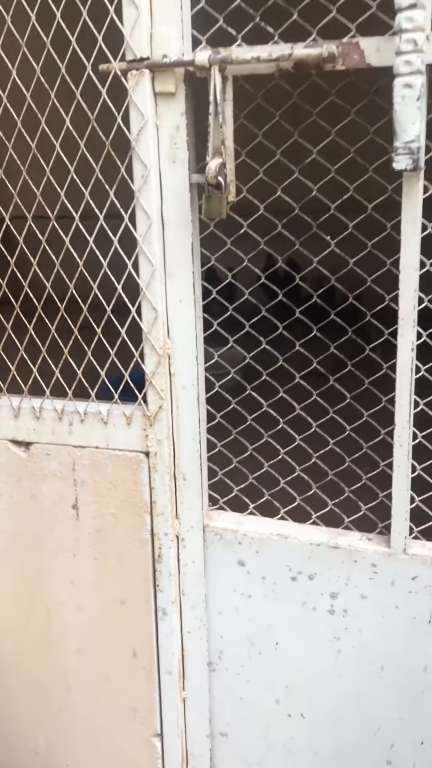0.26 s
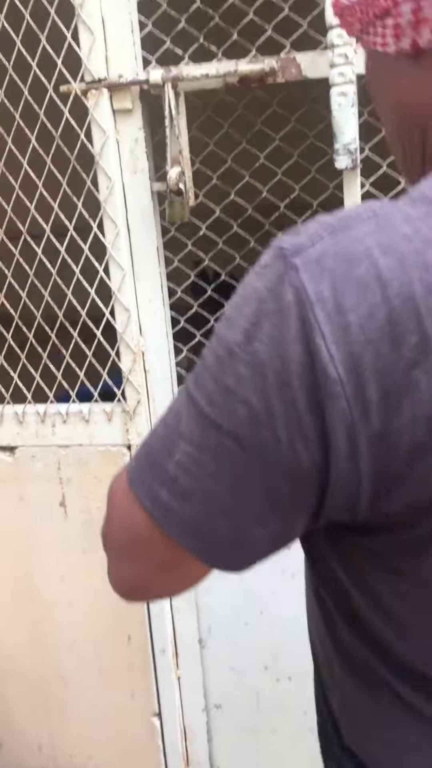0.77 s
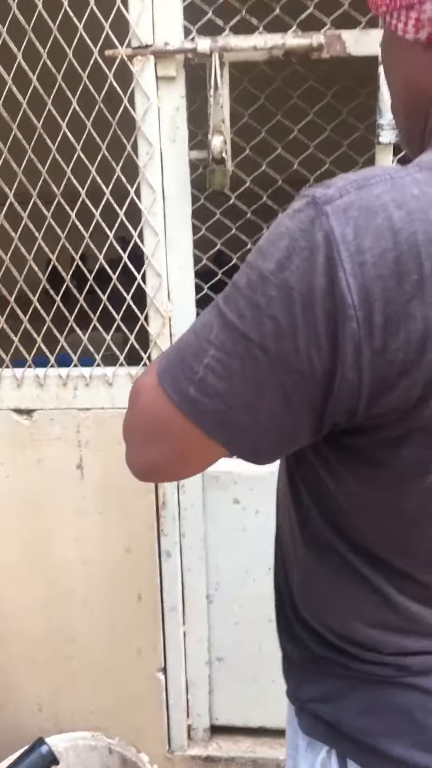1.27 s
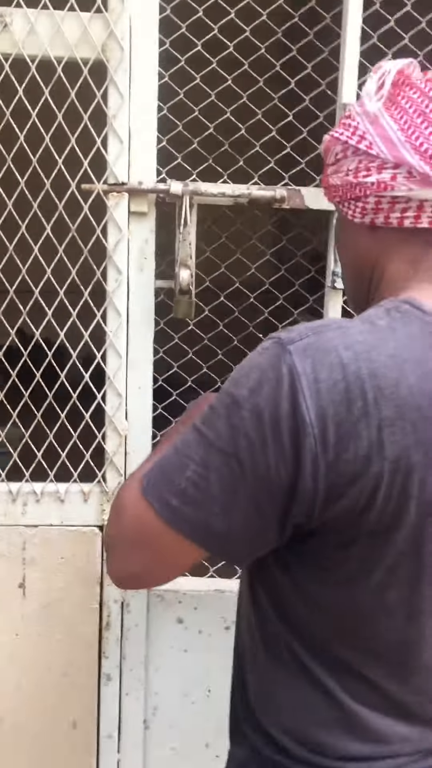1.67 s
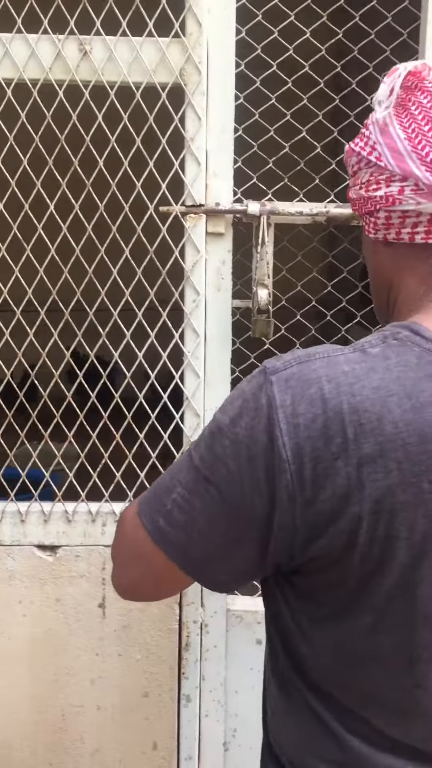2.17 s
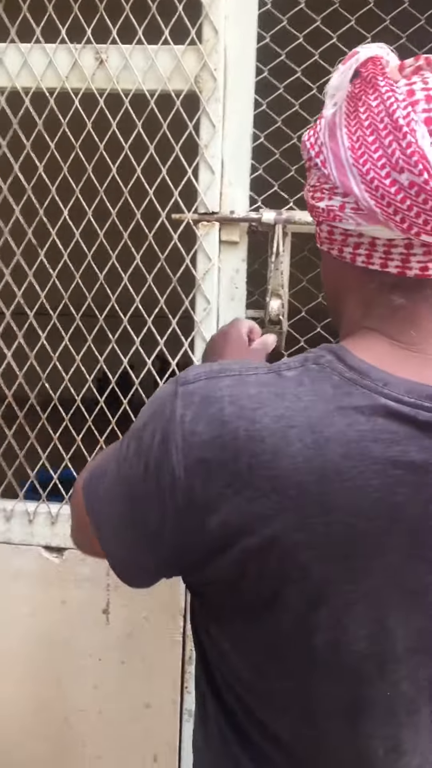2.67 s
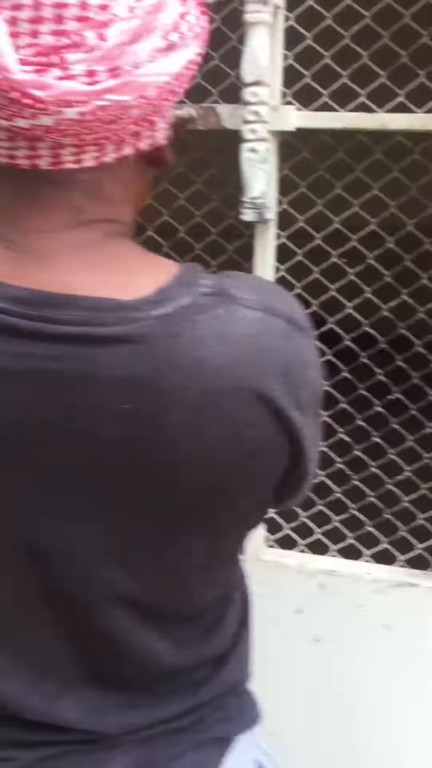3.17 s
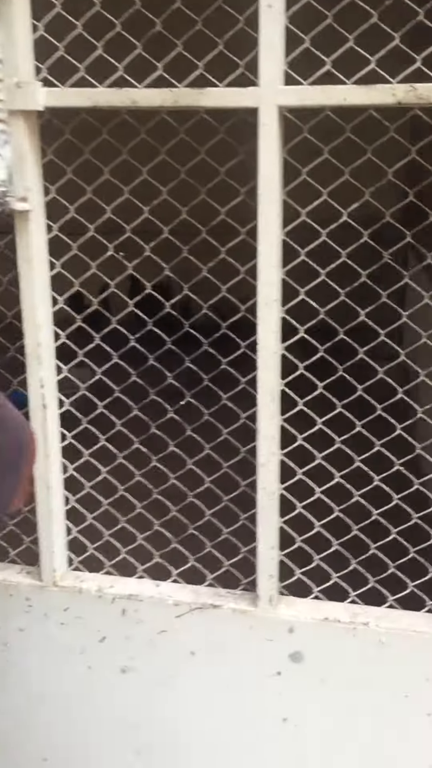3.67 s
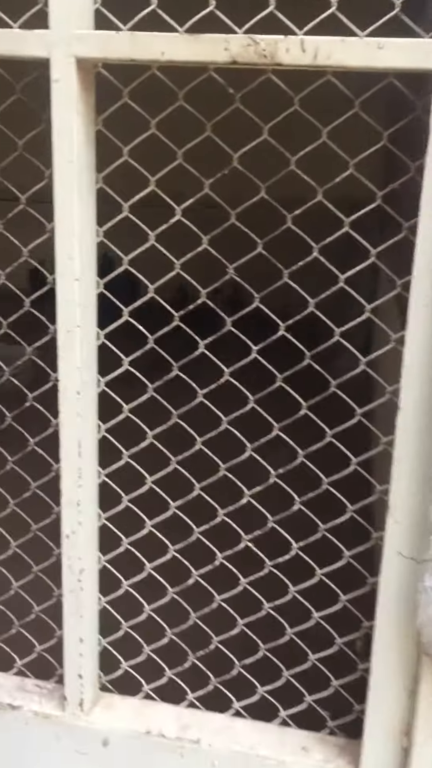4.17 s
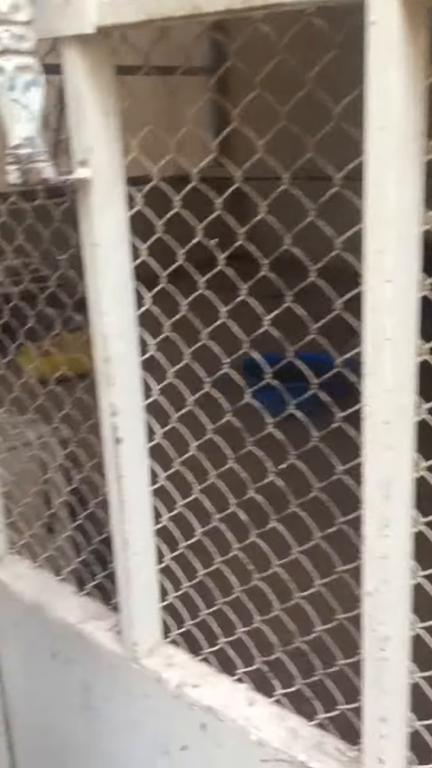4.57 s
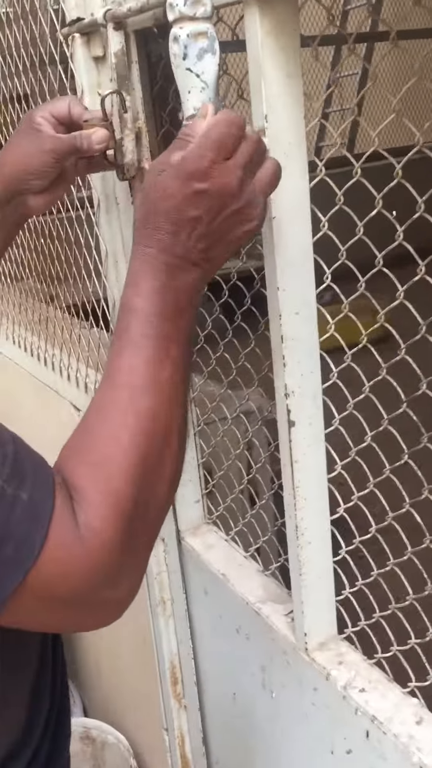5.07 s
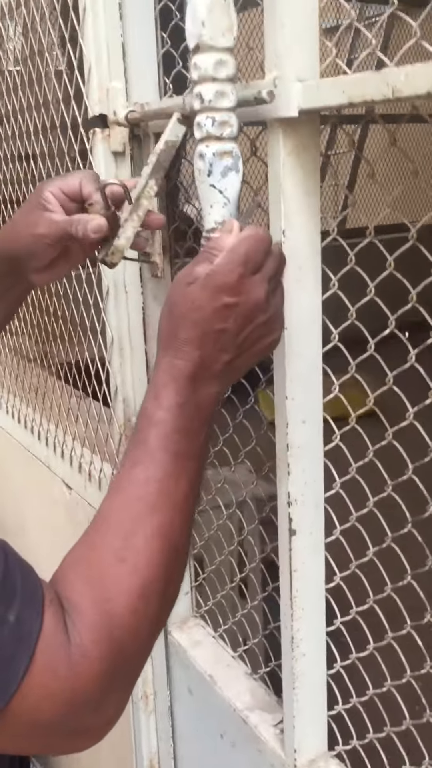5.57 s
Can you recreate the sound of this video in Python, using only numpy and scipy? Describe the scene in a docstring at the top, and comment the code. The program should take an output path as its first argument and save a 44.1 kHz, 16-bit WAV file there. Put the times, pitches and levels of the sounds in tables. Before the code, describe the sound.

Chickens call inside a bare-walled coop that adds a short ring, over faint, steady outdoor air. In the first second come thin, soft whines, faint rustles and light clicks of a steel door bolt. High, falling peeps from further back recur throughout. Short, irregular clucks start at 0.6 seconds and continue, several a second, some louder and higher. At 1.4 seconds a hen gives a brief rising moan that ends hoarse. Louder squawks at 1.9 and 3.5 seconds each last about a third of a second, breaking from a clear note into a rasp. The bolt clicks now and then, and knocks and scrapes more firmly at about 4.3 and 4.6 seconds, rattling the wire door. At 5.5 seconds a third, shorter squawk is almost all rasp, and the bolt makes its loudest knocks and scrape just after.

```python
"""Hens in a bare-walled coop behind a wire door, over a quiet yard. First come thin whines, peeps from
further back and light clicks of the door's bolt, with faint rustles. Short clucks start at 0.6 s; a
moan rises at 1.4 s and turns hoarse. Squawks at 1.9 and 3.5 s break from a clear note into a rasp.
A third, at 5.5 s, is nearly all rasp, as the bolt knocks and scrapes its loudest. Each hen's voice is
a pulse train from the syrinx, shaped by throat and beak; the walls ring throughout."""
import sys
import numpy as np
from scipy import signal
from scipy.fft import rfft, irfft, next_fast_len
from scipy.io import wavfile
from scipy.ndimage import uniform_filter1d

SR = 44100
rng = np.random.default_rng(int(sys.argv[2]) if len(sys.argv) > 2 else 0)


def wav_record(signal):
    """Record a signal, one row per channel, as 16-bit PCM in the file named by sys.argv[1]."""
    frames = np.transpose(np.atleast_2d(signal))
    bounded = np.clip(frames, -1, 1)
    # unit amplitude maps onto the largest positive 16-bit level
    quanta = np.round(bounded * 32767).astype(np.int16)
    wavfile.write(sys.argv[1], SR, quanta)


N = 256200
TOP_HZ = 15800

# Open-air noise. Each row: frequency in Hz, relative level in dB.
YARD_SPECTRUM = [(25, -20), (55, 4.5), (110, -1), (200, -6.5), (450, -14), (900, -28), (2000, -18),
                 (4000, -19), (6500, -24), (10000, -30), (15000, -31)]
# Coop reverberation. Each row: frequency in Hz, T60 in seconds.
COOP_T60 = [(200, 0.71), (1000, 0.35), (3000, 0.37), (7000, 0.43), (14000, 0.026)]
# Rustles. Each row: peak time in seconds, length in seconds, level in dB.
RUSTLE_STROKES = [(.01, 0.04, -54), (0.114, 0.087, -59), (.36, 0.13, -55.5), (.51, 0.18, -45.5),
                  (0.697, 0.13, -54), (5.16, 0.3, -69)]
# Peeps. Each row: start and length in seconds, first pitch in Hz, limit of its fall as a share,
# level in dB.
PEEP_NOTES = [(.01, 0.025, 6180, 0.36, -54.5), (0.082, 0.06, 3990, 0.27, -48),
              (0.352, 0.1, 5330, 0.46, -46.5), (0.717, 0.065, 6580, 0.52, -50),
              (0.84, 0.094, 5020, 0.48, -48.5), (1.057, 0.11, 5220, 0.48, -47.5),
              (1.602, 0.079, 6135, 0.55, -40), (2.44, 0.12, 5170, 0.47, -42.5),
              (2.699, 0.1, 5170, 0.41, -44.5), (2.856, 0.12, 5485, 0.44, -45.5),
              (3.303, .055, 3890, 0.24, -48), (3.32, 0.032, 6930, 0.26, -51.5),
              (3.891, 0.14, 6150, .2, -49), (4.073, .11, 5160, 0.47, -48),
              (4.338, 0.057, 6100, 0.43, -46.5), (4.953, .135, 4950, 0.49, -43.5),
              (5.436, 0.062, 6100, .2, -63.5), (5.692, 0.13, 5630, 0.47, -51)]
# Whines. Each row: start and length in seconds, top pitch in Hz, level in dB, roughness from 0 to 1.
WHINE_NOTES = [(-.03, 0.13, 726, -47.5, 0.4), (.11, 0.11, 701.4, -46.5, 0.4), (.29, 0.12, 761, -48, 0.4),
               (.46, 0.13, 773.4, -46.5, 0.03), (.665, 0.053, 796, -49.5, 0.15)]
# Steel door's response. Each row: frequency in Hz, gain in dB.
DOOR_SPECTRUM = [(30, -36), (70, -11), (140, -9), (300, -0.5), (500, -4), (1000, 4.5), (1500, 5.5),
                 (2000, 4.5), (2900, 5), (4300, 1.5), (5500, -4), (7000, -10), (9000, -11), (11000, -20.5),
                 (15000, -27.5)]
# Modes of sheet and bolt. Each row: frequency in Hz, level in dB, T60 in seconds.
STEEL_MODES = [(219, -21.5, 1), (330.5, -25.5, 0.37), (1150, -7, 0.49), (1305, -2, 0.047),
               (2790, -4.5, 0.1), (3360, -14.5, 0.038), (4400, -11, 0.052), (8500, -30, .08)]
# Knocks of bolt and door. Each row: start in seconds, level in dB, tilt in dB per octave.
DOOR_KNOCKS = [(0.103, -51, 10.5), (0.223, -51, 16.5), (.332, -46, 1), (0.49, -40.5, 4.5),
               (0.507, -44.5, 12), (1.162, -42.5, -1), (1.183, -51, 17), (1.204, -49, 0), (1.287, -39, 5),
               (1.306, -48.5, 7), (2.265, -37.5, 4.5), (3.096, -54.5, 2.5), (3.864, -42.5, 3.5),
               (4.28, -30.5, 5.5), (4.491, -38.5, 1), (4.557, -30.5, 2.5), (4.84, -50.5, 8.5),
               (5.082, -45.5, -1), (5.128, -44, -1.5), (5.156, -54, -0.5), (5.558, -38, -4.5),
               (5.602, -23.5, 1), (5.633, -27.5, 1), (5.649, -28.5, 1)]
# Bolt strokes. Each row: peak time and length in seconds, level in dB, tilt in dB per octave.
BOLT_STROKES = [(0.016, 0.1, -48, 0), (0.53, 0.69, -52, -2), (1.18, 0.23, -51, 0.5),
                (4.307, 0.27, -43, -2.5), (4.557, 0.33, -37, -3), (5.005, 1, -54, -5),
                (5.644, .25, -27, -3.16), (5.79, 0.32, -48, -7.7)]
# Clucks. Each row: start and length in seconds, peak position as a share, nominal pitch in Hz,
# relative level in dB, mouth resonance in Hz.
CLUCK_NOTES = [(0.624, 0.039, 0.4, 310.3, -43, 726), (0.822, 0.051, 0.49, 275.2, -43, 900),
               (1.025, 0.082, 0.4, 297, -44, 1160), (1.081, 0.032, 1, 229.7, -37, 1840),
               (1.244, 0.059, 0.57, 271.5, -42, 1120), (1.667, 0.048, 0.62, 307, -44, 900),
               (1.825, 0.076, 0.4, 577, -31.5, 1000), (2.312, 0.042, 0.48, 293, -45, 910),
               (2.336, .06, 0.54, 660.6, -27.5, 771), (2.536, 0.054, 0.63, 310.6, -45, 915),
               (2.577, 0.076, 0.28, 628, -32.5, 1040), (2.762, 0.051, 0.57, 332, -41.5, 1050),
               (2.922, 0.039, 0.72, 341, -49, 820), (3.005, .046, 0.53, 333.3, -43, 890),
               (3.137, 0.053, 0.57, 413, -43.5, 1250), (3.21, 0.0647, 0.56, 544, -28.5, 1150),
               (3.397, 0.091, 0.37, 638.7, -29.5, 985), (3.862, 0.038, 0.63, 329.7, -44, 1060),
               (3.954, 0.07, 0.5, 674.3, -29, 1290), (4.047, .049, 0.41, 346.7, -39, 633),
               (4.162, 0.062, 0.47, 335.5, -47.5, 1090), (4.215, 0.059, 0.39, 369.5, -38.5, 1090),
               (4.273, 0.048, 0.57, 386.5, -42.5, 1150), (4.403, .051, .55, 363.3, -35.5, 800),
               (4.58, 0.064, 0.43, 550, -31.5, 2000), (4.778, 0.042, 0.56, 353, -37.5, 820),
               (4.988, 0.048, .5, 352, -39.5, 790), (5.238, 0.0858, 0.12, 562, -29.5, 2260),
               (5.47, 0.066, 0.4, 602.6, -27.5, 1150)]
# Effort of the moan. Each row: time in seconds, relative level in dB.
MOAN_EFFORT = [(1.362, -47), (1.376, -34), (1.398, -32), (1.434, -32.5), (1.45, -28), (1.548, -29),
               (1.595, -35)]
# Squawks. Each row: start, clear length and rasp length in seconds, top pitch in Hz, scoop, sag and
# rebound as shares of pitch, period-doubled opening in seconds, added tilt in dB per octave, level in dB.
SQUAWK_NOTES = [(1.895, .138, .18, 717, 0.027, 0.11, 0.0079, 0.059, 0.34, -23.5),
                (3.487, .122, .2, 730, 0.1, .17, 0.014, 0.008, -1.4, -23),
                (5.53, 0.0098, .18, 701.8, 0.042, .16, 0.11, 0.023, 1.2, -27.5)]
# Throat and beak response per call. Each row: frequency in Hz, gain in dB.
WHINE_TRACT = [(400, -15.5), (760, -3), (1480, 4), (2200, -22), (3000, -25), (5000, -35), (12000, -49)]
CLUCK_TRACT = [(200, -9.5), (350, -1), (620, 1.5), (1100, 4.5), (1550, -4.5), (2100, -8), (2500, -3.5),
               (3000, -26.5), (3800, -20), (4700, -33), (6300, -32.5), (9000, -43), (15000, -52)]
MOAN_TRACT = [(250, -34), (490, -6.5), (980, 5), (1450, -9), (1950, -13), (2450, -1.5), (2950, -14),
              (3450, -24.5), (3950, -13), (4450, -24.5), (5200, -37.5), (6500, -29), (8000, -34),
              (10000, -41), (15000, -47)]
SQUAWK_TRACT = [(330, -25), (520, -9), (690, 3), (1050, 8.5), (1400, 1.5), (1900, 4), (2400, -0.5),
                (2850, 0.5), (3250, -9.5), (3750, -4.5), (4700, -17.5), (5400, -13.5), (6500, -18.5),
                (9000, -27), (15000, -36)]


def undb(db):
    """Decibels to gain."""
    return 10 ** (np.asarray(db) / 20)


def unit(x):
    """Scale to rms 1."""
    return x / np.sqrt(np.mean(x ** 2) + 1e-18)


def ramp(t, length_s):
    """Rise from 0 at t = 0 to 1 at length_s."""
    return np.clip(t / length_s, 0, 1)


def at_hz(points, hz):
    """Read (Hz, value) rows on a log-frequency axis."""
    knots_hz, values = np.transpose(points)
    return np.interp(np.log(np.maximum(hz, 1)), np.log(knots_hz), values)


def colour(x, spectrum, tilt_db_oct=0, peak_hz=1000, peak_db=0, width_oct=.25):
    """Minimum-phase filter: a spectrum, tilted about 1 kHz, plus one resonance."""
    size = next_fast_len(len(x) + 4096)
    hz = np.maximum(np.fft.rfftfreq(size, 1 / SR), 20)
    db = at_hz(spectrum, hz) + tilt_db_oct * np.log2(hz / 1000)
    db += peak_db / (1 + (np.log2(hz / peak_hz) / width_oct) ** 2)
    cepstrum = irfft(np.log(undb(db)), size)
    cepstrum[1:size // 2] *= 2
    cepstrum[size // 2 + 1:] = 0
    return irfft(rfft(x, size) * np.exp(rfft(cepstrum)), size)[:len(x)]


def wander(count, rate_hz):
    """Smooth random drift, rms 1."""
    step = max(int(SR / rate_hz), 1)
    return unit(uniform_filter1d(uniform_filter1d(rng.standard_normal(count), step), step))


def add(track, start_s, x):
    """Mix x in; negative starts move to 0."""
    i = max(int(start_s * SR), 0)
    track[i:i + len(x)] += x[:max(N - i, 0)]


def stroke(peak_s, length_s, db, rise_share=.42):
    """Rubbing envelope: peaks at the hardest push, 20 dB down at both ends."""
    t = np.arange(N) / SR
    distance = np.maximum((peak_s - t) / rise_share, (t - peak_s) / (1 - rise_share)) / length_s
    return undb(db - 20 * distance)


def yard(level_db=-62.2):
    """Faint, steady open-air noise."""
    return unit(colour(rng.standard_normal(N), YARD_SPECTRUM)) * undb(level_db)


def coop(x, gap_s=0.0036, early_db=3, early_s=0.032):
    """Bare-wall reflections: a strong first cluster, then a tail whose top treble dies first."""
    t = np.arange(int(.7 * SR)) / SR
    hz = np.fft.rfftfreq(len(t), 1 / SR)
    noise, tail = rfft(rng.standard_normal(len(t))), 0
    for band_hz, t60_s in COOP_T60:
        band = at_hz([(f, f == band_hz) for f, _ in COOP_T60], hz)
        tail += irfft(noise * band, len(t)) * undb(-60 * t / t60_s)
    tail *= ramp(t - gap_s, gap_s) * (1 + undb(early_db) * np.exp(-t / early_s))
    return signal.fftconvolve(x, tail / np.sqrt(np.sum(tail ** 2)))[:N]


def rustle(grain_db=5, edge_hz=7000):
    """Tiny uneven catches in the high treble, as of a sleeve close by."""
    grains = rng.standard_normal(N) * undb(grain_db * wander(N, 250))
    hiss = signal.sosfilt(signal.butter(2, edge_hz, "high", fs=SR, output="sos"), grains)
    return unit(hiss) * sum(stroke(*row) for row in RUSTLE_STROKES)


def peeps(flutter_db=5, warble=.06, husk=.052):
    """Small birds: husky whistles that swell and slide down, each at its own pace."""
    track = np.zeros(N)
    for start_s, length_s, pitch_hz, fall, db in PEEP_NOTES:
        progress = np.arange(0, length_s, 1 / SR) / length_s
        count = len(progress)
        pace = rng.uniform(1.6, 2.2)
        slide = 1 - fall * (1 - np.exp(-progress * pace))
        hz = pitch_hz * slide * (1 + warble * wander(count, 137.6) + husk * wander(count, 1440))
        flutter = unit(undb(flutter_db * wander(count, 147)))
        gain = undb(db) * flutter * np.sin(np.pi * progress) ** 0.6
        add(track, start_s, gain * np.sin(2 * np.pi * np.cumsum(hz) / SR))
    return track


def door_knocks(contact_s=.003, knock_s=0.0052, rattle_s=0.018, rattle_db=-14, ring_db=-3):
    """Steel on steel: each knock rings the door and rattles its mesh."""
    t = np.arange(int(.6 * SR)) / SR
    envelope = np.exp(-t / knock_s) + undb(rattle_db) * np.exp(-t / rattle_s)
    envelope *= (1 - np.exp(-t / contact_s)) ** 2
    envelope /= envelope.max()
    modes = [undb(db - 60 * t / t60_s) * np.sin(2 * np.pi * hz * t) for hz, db, t60_s in STEEL_MODES]
    track = np.zeros(N)
    for start_s, db, tilt_db_oct in DOOR_KNOCKS:
        crack = envelope * unit(colour(rng.standard_normal(len(t)), DOOR_SPECTRUM, tilt_db_oct))
        ring = rng.standard_normal(len(modes)) @ modes  # each blow lands on another spot
        add(track, start_s, undb(db) * (crack + undb(ring_db) * ring))
    return track


def bolt_scrapes(grain_db=4):
    """The bolt slides through its guides in small catches."""
    catches = rng.standard_normal(N) * undb(grain_db * wander(N, 97))
    return sum(unit(colour(catches, DOOR_SPECTRUM, tilt_db_oct)) * stroke(peak_s, length_s, db)
               for peak_s, length_s, db, tilt_db_oct in BOLT_STROKES)


def syrinx(hz, rough, doubling, waver=0.00519, jitter=.125, shimmer=.75, air=.4):
    """One pulse a cycle. Driven hard, the membranes beat strong-weak, flap unevenly and hiss."""
    count = len(hz)
    drift = waver * (1 + 2 * rough) * wander(count, 77.4)
    hz = hz * (1 + drift + jitter * rough * wander(count, 900))
    phase = 2 * np.pi * np.cumsum(hz) / SR
    harmonics = range(1, int(TOP_HZ / np.median(hz)) + 1)
    pulses = unit(sum(np.cos(k * phase) * (k * hz < TOP_HZ) for k in harmonics))
    beats = 1 + doubling * np.cos(phase / 2) + shimmer * rough * wander(count, 930)
    hiss = air * rough * (1 + np.cos(phase)) * rng.standard_normal(count)
    return pulses * beats + hiss


def call(hz, rough, doubling, rasp_mix, tract,
         clear_db_oct=0.5, rasp_db_oct=-2.8, peak_hz=1400, peak_db=3):
    """Syrinx through the throat at even level, fading between a clear and a throaty timbre."""
    source = syrinx(hz, np.clip(rough, 0, 1), np.clip(doubling, 0, 1))
    clear = colour(source, tract, clear_db_oct)
    rasp = colour(source, tract, rasp_db_oct, peak_hz, peak_db)
    voice = (1 - rasp_mix) * clear + rasp_mix * rasp
    voice /= np.sqrt(uniform_filter1d(voice ** 2, size=900) + 1e-12)
    return voice * signal.windows.tukey(len(hz), .04)


def whines(attack_s=0.012, release_s=0.028, arch=0.042):
    """Thin, gently arching notes from a bird further back."""
    track = np.zeros(N)
    for start_s, length_s, pitch_hz, db, rough in WHINE_NOTES:
        t = np.arange(0, length_s, 1 / SR)
        hz = pitch_hz * (1 - arch * (2 * t / length_s - 1) ** 2)
        gain = undb(db) * ramp(t, attack_s) * ramp(length_s - t, release_s)
        add(track, start_s, gain * call(hz, rough, doubling=0, rasp_mix=rough, tract=WHINE_TRACT))
    return track


def clucks(open_s=0.01281, sag=0.2, relaxed_hz=356, opening_db_oct=5, gain_db=4):
    """The beak snaps open: pitch and resonances scoop up, the note brightens, then sags as it dies."""
    track = np.zeros(N)
    for start_s, length_s, peak_share, pitch_hz, db, mouth_hz in CLUCK_NOTES:
        press_oct = max(np.log2(pitch_hz / relaxed_hz), 0)  # pressed harder: higher, brighter, cleaner
        tilt_db_oct = -0.14 + 4 * press_oct
        t = np.arange(0, length_s, 1 / SR)
        progress = t / length_s
        closed = np.exp(-t / open_s)
        rough = np.clip(.42 - .19 * press_oct + closed / 2, 0, 1)
        source = syrinx(np.full(len(t), float(pitch_hz)), rough, doubling=0.2 * rough)
        dull = unit(colour(source, CLUCK_TRACT, tilt_db_oct - opening_db_oct, peak_hz=1150, peak_db=11))
        bright = unit(colour(source, CLUCK_TRACT, tilt_db_oct, mouth_hz, peak_db=8))
        scoop = rng.uniform(.15, .42)
        speed = 1 - scoop * closed - sag * np.maximum(progress - .5, 0)
        note = np.interp(np.cumsum(speed) / SR, t, closed * dull + (1 - closed) * bright)
        effort = np.interp(progress, [0, np.clip(peak_share, .1, .8), 1], [.05, 1, 0])
        add(track, start_s, undb(db + gain_db) * effort * note)
    return track


def moan(top_hz=496.6, climb_hz_per_s=124, top_s=1.505, break_s=1.55, slip_s=0.0098, drop=0.0856,
         settle_s=0.032, gain_db=-0.5):
    """A held note that settles, creeps up, then slips down and ends hoarse."""
    times_s, db = np.transpose(MOAN_EFFORT)
    t = np.arange(times_s[0], times_s[-1], 1 / SR)
    slipped = (1 + np.tanh((t - break_s) / slip_s / 2)) / 2
    hz = (top_hz - climb_hz_per_s * np.maximum(top_s - t, 0)) * (1 - drop * slipped)
    rough = .09 + .25 * np.exp((t[0] - t) / settle_s) + .5 * slipped ** 2
    voice = call(hz, rough, doubling=.3 * slipped, rasp_mix=slipped, tract=MOAN_TRACT,
                 clear_db_oct=2.74, rasp_db_oct=3.5, peak_db=15)
    track = np.zeros(N)
    add(track, t[0], undb(gain_db + np.interp(t, times_s, db)) * voice)
    return track


def squawks(attack_s=0.021, crack_s=.028, break_s=0.018, release_s=0.068, droop=.06, throb_db=2.3):
    """A cracked start, a clear arch, a catch, then a rasp that sags and rebounds as the air runs out."""
    track = np.zeros(N)
    for start_s, clear_s, rasp_s, top_hz, scoop, sag, rebound, doubled_s, tilt_db_oct, db in SQUAWK_NOTES:
        t = np.arange(0, clear_s + rasp_s, 1 / SR)
        arch = np.where(t < clear_s / 2, scoop, droop) * (2 * ramp(t, clear_s) - 1) ** 2
        dip = np.interp((t - clear_s) / rasp_s, [0, .46, .84], [0, sag - droop, -rebound - droop / 2])
        broken = ramp(t - clear_s + break_s / 2, break_s)
        rough = .025 + .5 * np.exp(-t / crack_s) + .5 * broken
        doubling = np.maximum(1 - ramp(t - doubled_s, crack_s), .5 * broken)
        effort = ramp(t, attack_s) * ramp(t[-1] - t, release_s)
        catch_db = -4 * np.exp(-((t - clear_s + break_s) / break_s) ** 2)
        gain = effort * undb(db + catch_db + throb_db * wander(len(t), 59))
        rasp_mix = 1 - ramp(t, crack_s) * (1 - ramp(t, clear_s) ** 2)  # brightest once the beak opens
        voice = call(top_hz * (1 - arch - dip), rough, doubling, rasp_mix, SQUAWK_TRACT,
                     clear_db_oct=2.5 + tilt_db_oct, rasp_db_oct=-1.5 + tilt_db_oct / 2,
                     peak_hz=1540, peak_db=5)
        add(track, start_s, gain * voice)
    return track


def scene():
    """Mono mix. The further back a source, the more of it comes by way of the walls."""
    sources = [(clucks(), -3), (moan() + squawks(), -7), (whines(), -2), (peeps(), 2),
               (door_knocks() + bolt_scrapes(), -11)]
    direct = sum(x / np.hypot(1, undb(wet_db)) for x, wet_db in sources)
    to_walls = sum(x / np.hypot(1, undb(-wet_db)) for x, wet_db in sources)
    return (direct + coop(to_walls) + rustle() + yard())[None]


def record(dry, low_hz=40):
    """Thin the deepest bass and cut the top."""
    thinned = signal.sosfilt(signal.butter(2, low_hz, "high", fs=SR, output="sos"), dry)
    return signal.sosfilt(signal.ellip(10, .2, 70, TOP_HZ, fs=SR, output="sos"), thinned)


dry = scene()
out = record(dry)
wav_record(out)
```